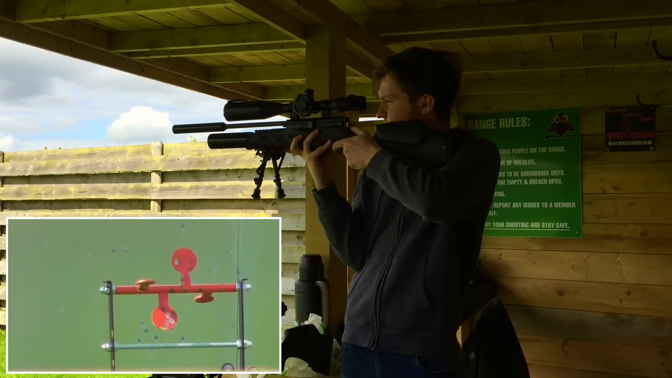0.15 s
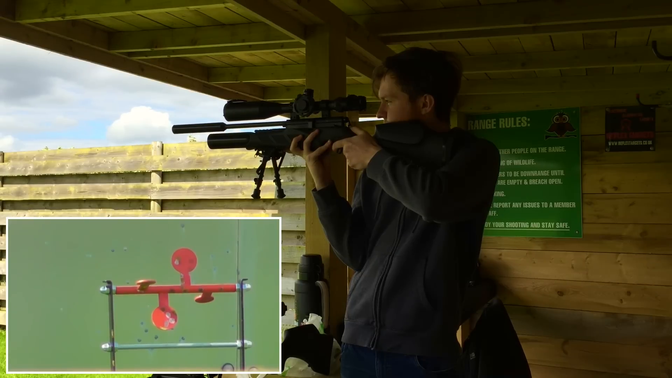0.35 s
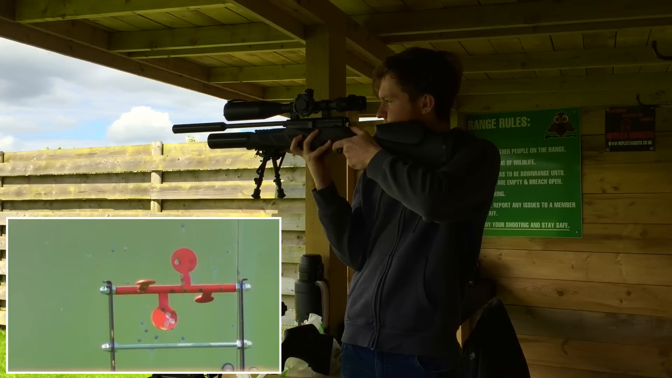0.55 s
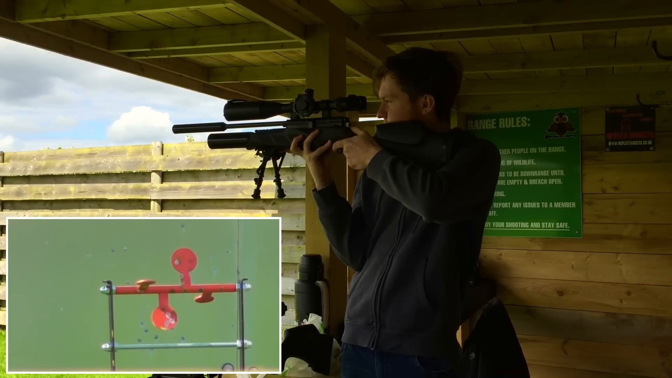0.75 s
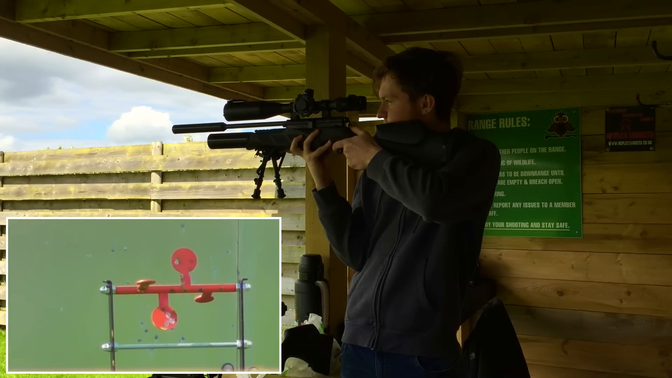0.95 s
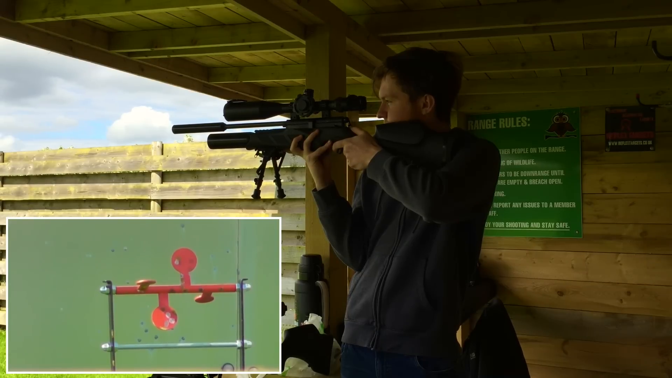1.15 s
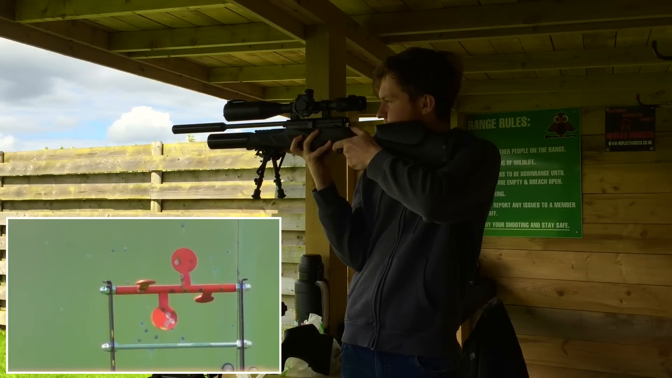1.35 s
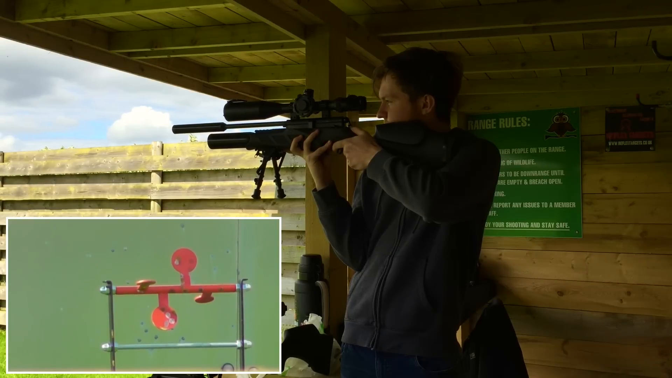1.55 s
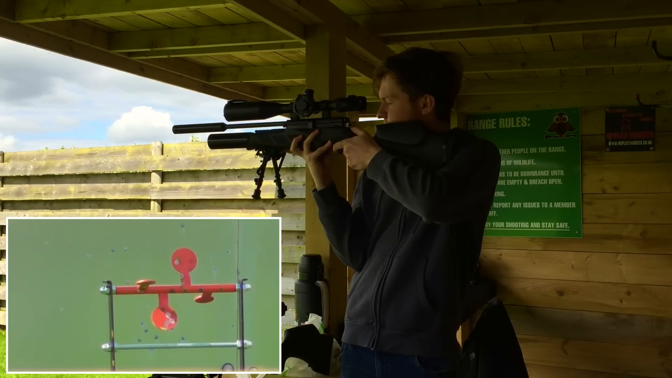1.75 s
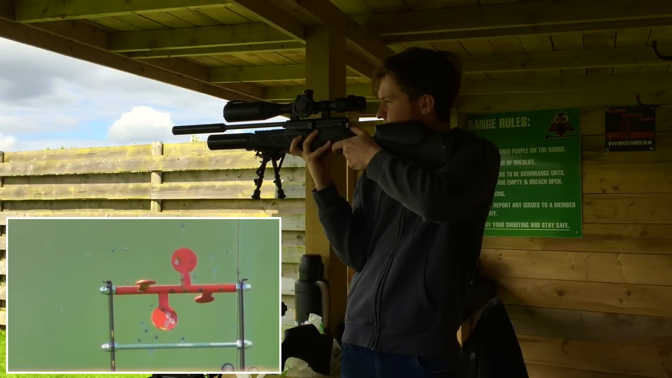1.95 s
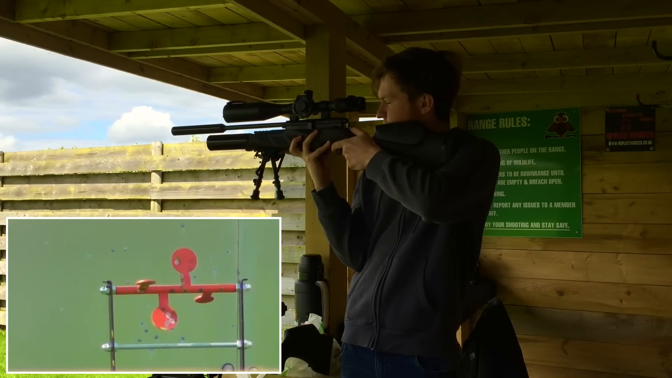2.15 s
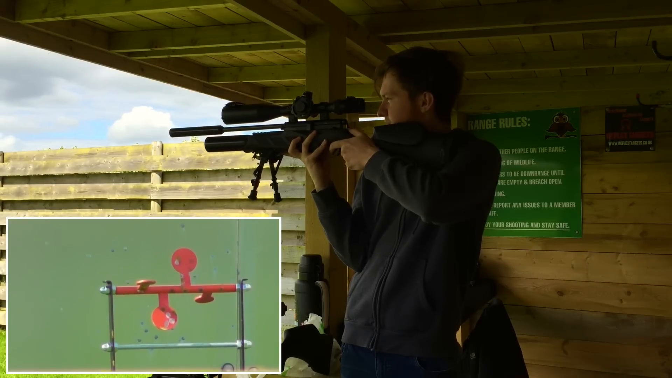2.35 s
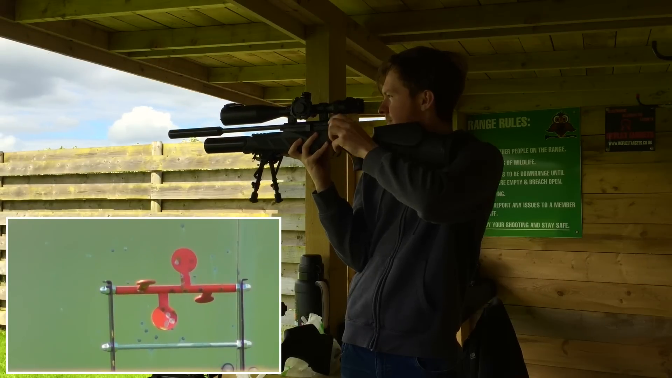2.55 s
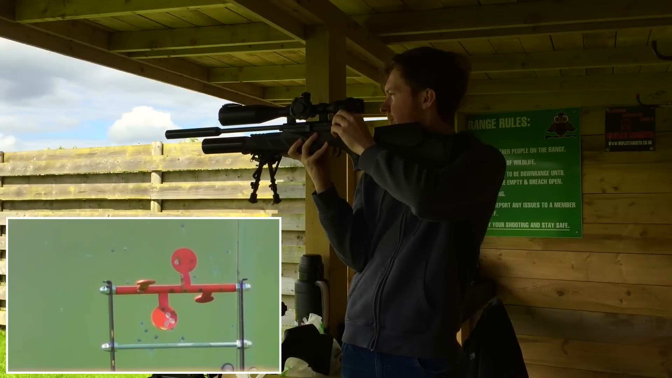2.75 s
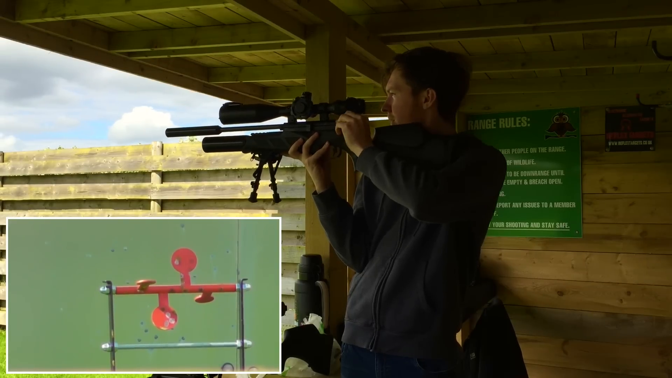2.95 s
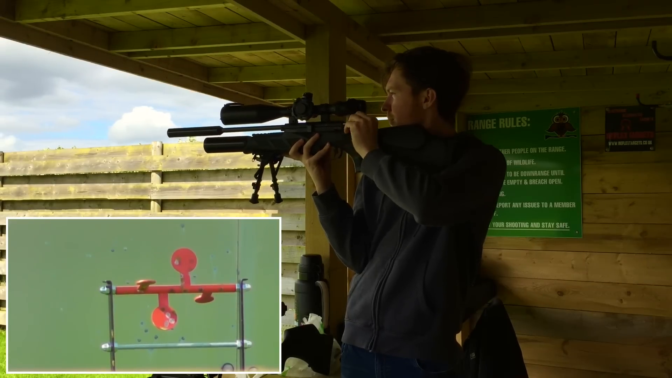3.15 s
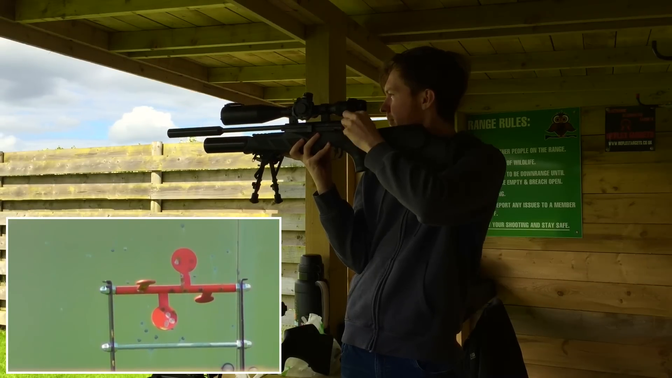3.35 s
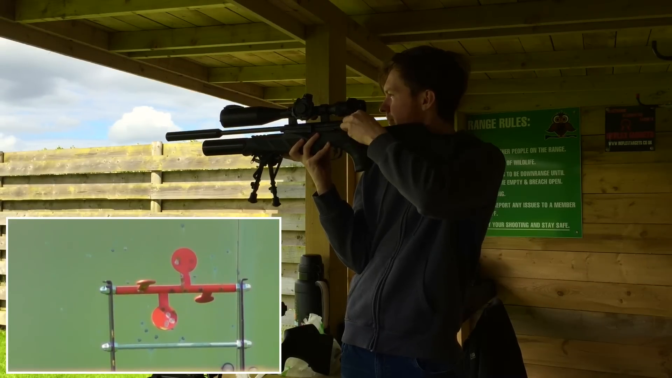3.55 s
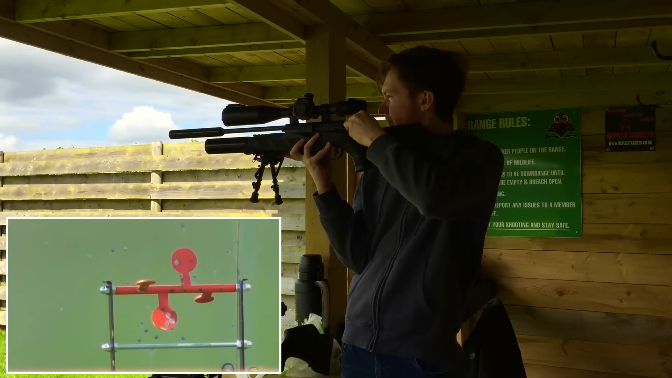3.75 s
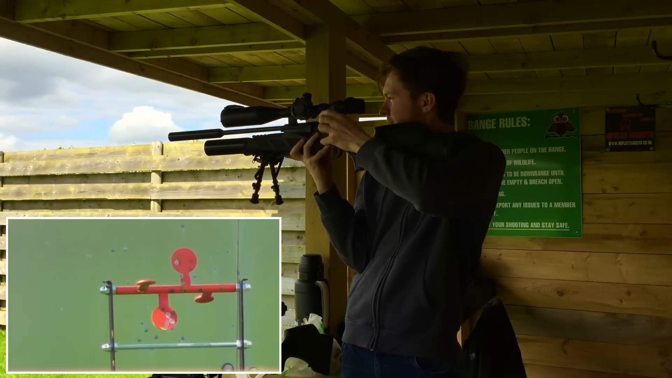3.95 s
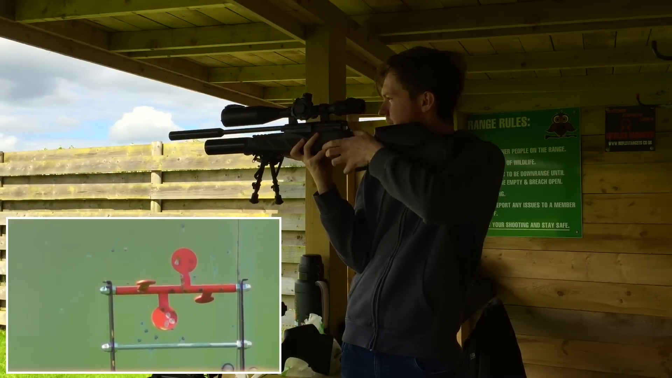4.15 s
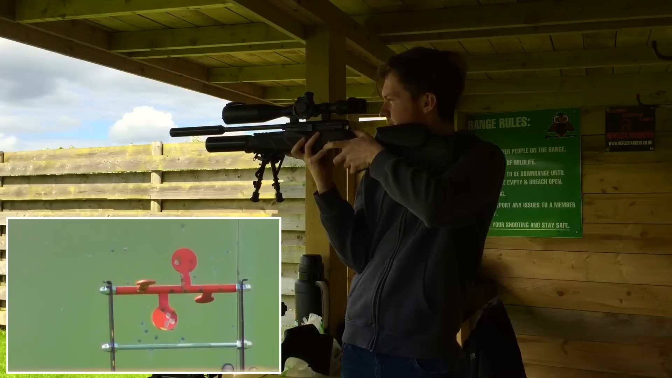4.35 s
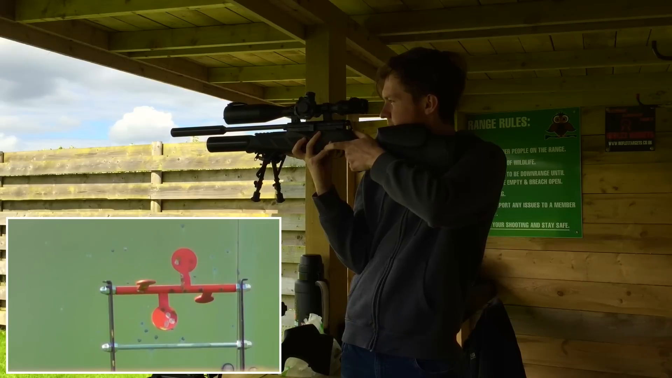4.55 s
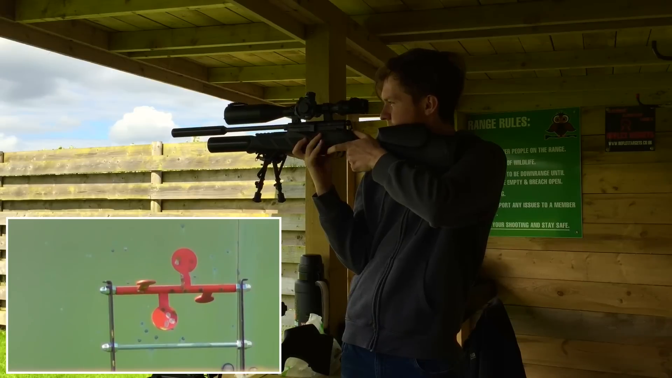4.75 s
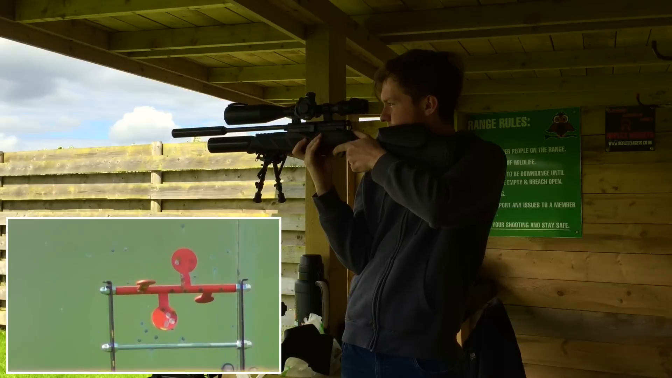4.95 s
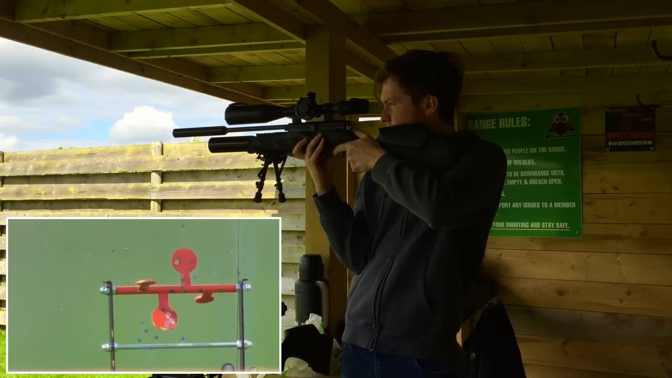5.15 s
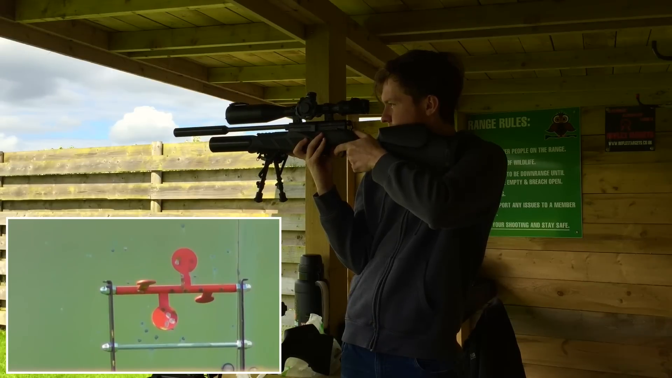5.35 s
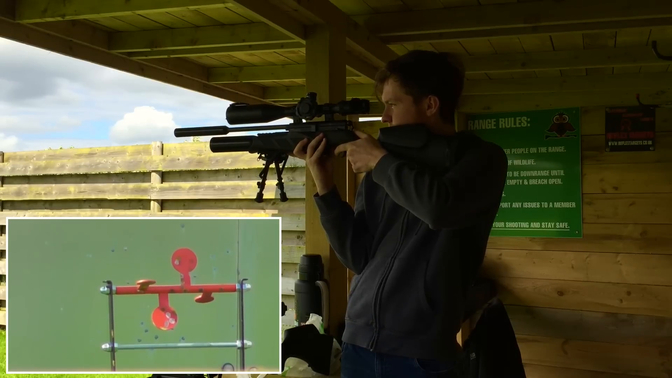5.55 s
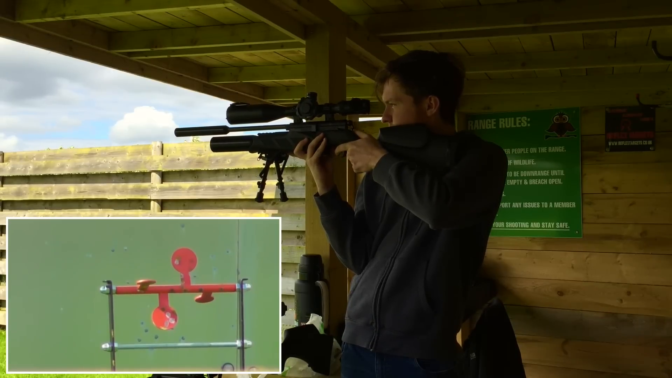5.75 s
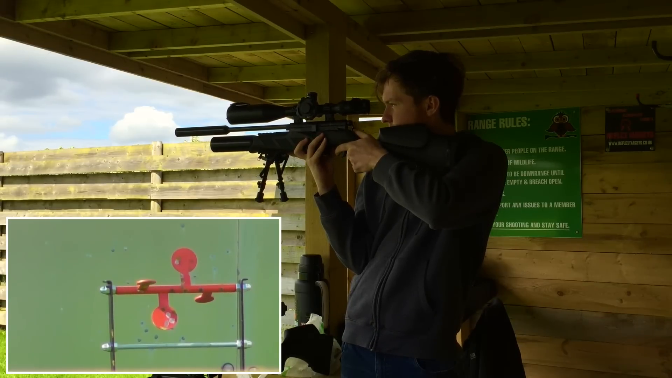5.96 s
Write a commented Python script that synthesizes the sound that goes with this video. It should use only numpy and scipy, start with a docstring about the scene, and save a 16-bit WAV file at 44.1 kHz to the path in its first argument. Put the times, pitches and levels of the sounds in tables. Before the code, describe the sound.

An air rifle fires once, the pellet clangs off a steel target, then the bolt clicks through a reload over light wind.

```python
"""On an outdoor range, an air rifle is fired from a wooden shelter: a hammer knocks a valve open and
air bursts out. The pellet splatters on a steel spinner target, which rings and echoes off a fence.
The shooter unlatches the bolt, draws it back, pushes it forward and locks it, with clicks and knocks.
A light wind rumbles on the microphone over a distant hum.
A "fade time" is how long a sound takes to drop 60 dB; a "tilt" above zero makes it brighter."""
import sys
import numpy as np
from scipy import signal
from scipy.fft import rfft, irfft, next_fast_len
from scipy.io import wavfile
from scipy.ndimage import uniform_filter1d

SR = 44100
rng = np.random.default_rng(int(sys.argv[2]) if len(sys.argv) > 2 else 0)


def to_wav(s):
    """Save 16-bit WAV."""
    ch = np.atleast_2d(s).T  # columns
    pcm = np.round(np.clip(ch, -1, 1) * 32767)  # PCM
    wavfile.write(sys.argv[1], SR, pcm.astype(np.int16))


N = 265305
TIME = np.arange(N) / SR   # seconds since the scene began
AGE = TIME[:int(1.2 * SR)]   # seconds since a single sound began

# air leaving the muzzle: (time [s], level [dB], fade time [s], tilt [dB/octave])
AIR_BLASTS = [(1.7733, -13, 0.06, 0), (1.7830, -25, .03, 0.0045)]
# the pellet and its fragments hitting steel: (time [s], level [dB], fade time [s], tilt [dB/octave])
PELLET_HITS = [(2.0544, -20, .005, 0), (2.0620, -26, .006, 1), (2.1036, -27, .006, 0),
               (2.1350, -32, .008, -3)]
SHOT_S, HIT_S = AIR_BLASTS[0][0], PELLET_HITS[0][0]


def shot():
    """The hammer knocks the valve open and air bursts from the muzzle."""
    # hammer blows: (time [s], level [dB], fade time [s], tilt [dB/octave])
    hammer_blows = [(1.764, -40, 0.092, -2.5), (1.7705, -13, 0.0016, -3), (1.7715, -15.5, 0.0031, -0.5)]
    # tone of the shot: (frequency [Hz], relative level [dB])
    shot_colour = [(35, -30), (70, -4), (270, -2), (480, -11), (900, -5.5), (1130, -6), (1500, -3),
                   (2100, -3.5), (3000, -5), (4000, -3), (4900, -6), (7000, -4), (10500, -10), (16000, -14)]
    out = np.zeros(N)
    for s, db, fade_s, tilt in hammer_blows + AIR_BLASTS:
        add(out, s, from_db(db) * burst(shot_colour, fade_s, tilt))
    return out


def rifle_ring_and_boom(boom_db=-17, boom_rise_s=.022, boom_fade_s=0.13):
    """The rifle's tubes ring on, and a low boom builds up under the roof."""
    # notes of the barrel and air cylinder: (pitch [Hz], level [dB], fade time [s])
    rifle_notes = [(1074, -27, 0.13), (614.3, -32, 0.22), (3494, -34, 0.15), (4041, -27, 0.14),
                   (5644, -28.5, 0.21), (7500, -32, 0.081), (9120, -30, 0.11)]
    # tone of the boom: (frequency [Hz], relative level [dB])
    boom_colour = [(40, -13), (85, 2), (160, -5.5), (265, 5), (490, -9), (660, 2), (1100, -4), (2200, -15),
                   (8000, -46)]
    out = np.zeros(N)
    loudness = (1 - np.exp(-(AGE / boom_rise_s) ** 2)) * fade(boom_fade_s)
    boom = colour(rng.standard_normal(len(AGE)) * loudness, boom_colour)
    add(out, SHOT_S, from_db(boom_db) * boom + ring(rifle_notes))
    return out


def pellet_splat(splat_db=-24):
    """The pellet and its fragments crack on the steel, and the soft lead flattens."""
    # tone of each crack: (frequency [Hz], relative level [dB])
    crack_colour = [(200, -44), (900, 2), (7000, 7), (16000, -11)]
    # tone of the lead flattening: (frequency [Hz], relative level [dB])
    splat_colour = [(1000, -20.5), (5000, -3), (6800, 13), (8200, -1), (10000, -41)]
    out = np.zeros(N)
    for s, db, fade_s, tilt in PELLET_HITS:
        add(out, s, from_db(db) * burst(crack_colour, fade_s, tilt))
    add(out, HIT_S, from_db(splat_db) * burst(splat_colour, fade_s=0.049))
    return out


def spinner_clang(crowd_db=-31, wash_db=-28, notes_db=-3):
    """The struck spinner and its frame ring with a few strong notes and a crowd of weak ones."""
    # strong notes: (pitch [Hz], relative level [dB], fade time [s])
    spinner_notes = [(1098, -47.5, 1), (1450, -55, .7), (1600, -39, 0.48), (1620, -53, 0.58),
                     (2014, -25.5, 0.19), (2060, -48, 0.43), (2114, -29, 0.21), (2354, -37.5, 1),
                     (2547, -34, 0.88), (2557, -44, 0.42), (2910, -29.5, 0.2), (3500, -44, .65),
                     (3430, -48.5, 0.55), (3990, -44, 0.66), (4180, -32.5, 0.55), (4370, -31.5, 0.32),
                     (4340, -74, .5), (5470, -44, .6), (6000, -39, 0.38), (6770, -49.5, 0.794)]
    # tone of the weak notes: (frequency [Hz], relative level [dB])
    clang_colour = [(200, -17.5), (550, -22), (850, -12), (1300, -3), (2200, 7.5), (3100, -0.5), (4000, 7),
                    (5000, 0), (7000, 2.5), (9500, 0), (12000, -2), (16000, -6.5)]
    # how long the weak notes ring: (frequency [Hz], fade time [s])
    clang_fades = [(300, 1), (1200, 1), (2300, 0.9), (4000, 0.69), (7000, 0.56), (10000, 0.4),
                   (14000, 0.29)]
    out = np.zeros(N)
    crowd = from_db(crowd_db) * dying_noise(clang_fades, notes_per_hz=0.092)
    wash = from_db(wash_db) * dying_noise(clang_fades) * fade(3.3)   # the most crowded notes die first
    clang = colour(crowd + wash, clang_colour) + from_db(notes_db) * ring(spinner_notes)
    spreading = 1 - 0.19 * fade(0.064)   # the shaking takes a moment to fill the frame
    add(out, HIT_S, clang * spreading)
    return out


def lead_spray(db=-33, start_hz=17400, end_hz=11200, drop_hz_per_s=105000):
    """Bits of lead spray off: a hiss that swells after the hit while its pitch drops."""
    pitch = np.clip(start_hz - drop_hz_per_s * (TIME - HIT_S), end_hz, start_hz)
    loudness = from_db(db) * swell(2.112, rise_s=.023, fall_s=.010) * (TIME > HIT_S)
    return loudness * narrow_noise(pitch, width_hz=1900)


def bolt_action(steel_ring_db=-8, stock_ring_db=-7, bounce_s=.002, bounce_db=-2.5):
    """The bolt slides; each contact clicks on steel, knocks on the stock (the rifle's body) and bounces."""
    # parts meeting: (time [s], steel level [dB], stock level [dB], steel tilt [dB/octave])
    contacts = [(2.462, -58, -56.5, -13), (3.2594, -38.5, -36.5, 0), (3.7100, -37.5, -44, 0),
                (3.7235, -17.5, -27.5, 1), (3.88, -44.5, -47.5, -11.5), (3.966, -47, -71, 2.5),
                (4.0019, -40.5, -59, 1.5), (4.0210, -46, -44, 4), (4.0435, -22, -29, 3.5),
                (4.178, -39, -27, 8)]
    # tones of a click and of a knock: (frequency [Hz], relative level [dB])
    steel_colour = [(300, -32), (1200, -16.5), (2400, -1.5), (3100, -0.5), (4600, -1), (5600, 8),
                    (6600, -1.5), (8200, -1.5), (10500, -7), (12700, -6.5), (16000, -17.5)]
    stock_colour = [(120, -35), (300, -15), (450, -19), (650, -2), (950, -4.5), (1450, 4.5), (1850, -1.5),
                    (2500, -6.5), (4000, -7.5), (9000, -24.5), (16000, -33)]
    # notes of the steel and of the stock: (pitch [Hz], relative level [dB], fade time [s])
    steel_notes = [(2330, -28, .1), (3710, -33, .1), (5560, -28, .22), (6400, -35, .1)]
    stock_notes = [(1310, -25, 0.1), (1470, -22.5, 0.057)]
    # slides of the bolt: (peak time [s], level [dB])
    slides = [(3.705, -58.5), (4.018, -55)]
    out = np.zeros(N)
    steel_ring, stock_ring = ring(steel_notes), ring(stock_notes)
    for s, steel_db, stock_db, tilt in contacts:
        fade_s = .011 * np.exp(-0.0166 * steel_db)   # a hard contact snaps shut, a light one chatters on
        bounce_delay = bounce_s * rng.uniform(.5, 2)
        for delay, db in ((0, 0), (bounce_delay, bounce_db)):
            add(out, s + delay, from_db(steel_db + db) * burst(steel_colour, fade_s, tilt))
            add(out, s + delay, from_db(stock_db + db) * burst(stock_colour, fade_s))
        add(out, s, from_db(steel_db + steel_ring_db) * steel_ring)
        add(out, s, from_db(stock_db + stock_ring_db) * stock_ring)
    return out + sliding(slides, stock_colour, rise_s=0.021, fall_s=0.014)


def handling(note_db=-3.0, tick_db=-2.0):
    """Small tinks, each a tick with a short note, and a soft rub of the hand along the stock."""
    # tinks: (time [s], pitch [Hz], relative level [dB], note's fade time [s])
    tinks = [(2.6970, 4140, -40.5, .04), (2.6965, 9300, -65, .035), (2.8910, 3950, -55, .04),
             (3.2240, 6200, -61, .03)]
    # stroke of the hand: (peak time [s], level [dB])
    rubs = [(3.072, -50.5)]
    # tone of the hand on the stock: (frequency [Hz], relative level [dB])
    rub_colour = [(90, -8), (220, 13), (390, -7), (500, -2), (565, 7), (660, 0), (850, -6), (1400, -31),
                  (8000, -57)]
    out = np.zeros(N)
    for s, hz, db, fade_s in tinks:
        tick_colour = [(.6 * hz, -45), (.92 * hz, -18), (hz, 0), (1.08 * hz, -18), (1.5 * hz, -45)]
        add(out, s, from_db(db + tick_db) * burst(tick_colour, fade_s=0.031))
        add(out, s, ring([(hz, db + note_db, fade_s)]) * (1 - fade(0.0045)))
    return out + sliding(rubs, rub_colour, rise_s=.011, fall_s=0.049)


def sliding(strokes, spectrum, rise_s, fall_s):
    """Two surfaces rub, making noise that swells with each short stroke."""
    pressure = sum(from_db(db) * swell(s, rise_s, fall_s) for s, db in strokes)
    return pressure * colour(rng.standard_normal(N), spectrum)


def with_echoes(sound, shelter_db, field_db, first_echo_s=0.002664):
    """Roof and walls answer almost at once; fences and trees scatter a faint, long tail."""
    # how long the near and far echoes last: (frequency [Hz], fade time [s])
    shelter_fades = [(100, 0.34), (500, 0.245), (2000, 0.2261), (6000, 0.1435), (14000, 0.19)]
    field_fades = [(100, .7), (1000, 1.2), (4000, 0.97), (8000, 1.6), (14000, 0.93)]
    # tone of the far echoes: (frequency [Hz], relative level [dB])
    field_colour = [(100, -5.5), (500, 0.5), (1200, 2), (2400, 1.5), (4000, 1), (7000, -7), (14000, -9)]
    near = even(dying_noise(shelter_fades), evenness=0.33) * np.clip(AGE / first_echo_s - .5, 0, 1)
    far = colour(dying_noise(field_fades) * (1 - fade(0.069)), field_colour)
    echoes = from_db(shelter_db) * near / np.linalg.norm(near)
    echoes += from_db(field_db) * far / np.linalg.norm(far)
    return sound + signal.fftconvolve(sound, echoes)[:N]


def fence_echo(sound, delay_s=.04, echo_db=-14):
    """Boards throw back a dull, smeared copy."""
    # tone of the echo: (frequency [Hz], relative level [dB])
    board_colour = [(300, -9), (1200, 4), (2500, -8), (5000, -32.0), (12000, -13.0)]
    out = np.zeros(N)
    smear = burst(board_colour, fade_s=0.1)
    add(out, delay_s, signal.fftconvolve(sound, smear / np.linalg.norm(smear))[:N])
    return from_db(echo_db) * out


def wind(wander_db=3.5, sag_s=0.023, swirl_db=-17.5):
    """Wind rumbles unevenly on the microphone; short puffs sag in pitch and stir up small swirls."""
    # strength of the rumble: (time [s], level [dB])
    strength = [(0, -52), (0.33, -62), (0.5, -50), (0.78, -60), (0.95, -52.5), (1.3, -52.5), (1.5, -58),
                (1.85, -50.5), (2.2, -56), (3.0, -52), (3.9, -56), (4.22, -53), (4.34, -63.5),
                (4.58, -49.5), (4.92, -59), (5.3, -53), (6.02, -57.5)]
    # puffs: (peak time [s], level [dB], pitch at the peak [Hz])
    puffs = [(0.037, -40, 104), (0.206, -39, 91), (0.246, -41.5, 70.5), (0.649, -40.5, 72),
             (1.122, -38, 91.5), (2.406, -38.5, 85), (2.967, -40.5, 86.2), (3.147, -39.5, 100),
             (3.577, -42, 100), (3.640, -27.5, 95), (4.571, -42, 112), (4.625, -43.5, 61.9),
             (4.884, -38, 77), (5.256, -36.5, 90), (5.683, -42.5, 68)]
    # tones of the rumble and of the swirls: (frequency [Hz], relative level [dB])
    rumble_colour = [(15, -42), (30, -12), (55, 2.5), (100, -2), (125, -8.5), (170, -15.5), (260, -29.5),
                     (400, -39.5), (1500, -79.5)]
    swirl_colour = [(60, -11), (150, 2.5), (280, -4), (450, -24), (1200, -60)]
    rumble = colour(rng.standard_normal(N), rumble_colour)
    swirls = from_db(swirl_db) * colour(rng.standard_normal(N), swirl_colour)
    rumble /= np.sqrt(uniform_filter1d(rumble ** 2, size=2500))   # steady the level before shaping it
    rumble_db = np.interp(TIME, *np.transpose(strength)) + wander_db * wander(step_s=.05)
    out = from_db(rumble_db) * rumble
    for s, db, hz in puffs:
        cycles = hz * sag_s * (1 - np.exp(np.minimum((s - TIME) / sag_s, 2)))
        push = from_db(db) * swell(s, rise_s=0.0074, fall_s=0.014)
        out += push * (np.sin(2 * np.pi * cycles) + swirls)
    return out


def distant_hum_and_air(air_db=-66.63, swell_db=1.78):
    """A wavering hum, and far-off noise that swells gently."""
    # notes of the hum: (pitch [Hz], level [dB])
    hum_notes = [(189.5, -67.5), (212, -74), (236, -74.5), (283, -80)]
    # tone of the far-off noise: (frequency [Hz], relative level [dB])
    air_colour = [(150, -29.5), (250, -4), (308, -8.5), (436, -12.5), (597, -10.5), (735, -5), (955, -5.5),
                  (1120, -10.5), (1980, -19), (3460, -25), (4900, -29), (9330, -34), (10400, -36.5),
                  (14400, -36.5), (16000, -50.5)]
    hum = sum(from_db(db) * narrow_noise(hz, width_hz=14) for hz, db in hum_notes)
    gain = from_db(swell_db * wander(step_s=0.17))
    air = from_db(air_db) * colour(rng.standard_normal(N), air_colour)
    low_air = signal.sosfilt(signal.butter(2, 1500, fs=SR, output="sos"), air)
    return hum + air + (gain - 1) * low_air   # the high hiss stays steady


def burst(spectrum, fade_s, tilt=0):
    """A short, fading rush of random pressure pulses."""
    count = SR // 10
    pulses = rng.choice([-1, 1], count) * fade(fade_s)[:count]
    return colour(even(pulses), spectrum, tilt)


def ring(notes):
    """A struck object's fading notes, each starting at a random point in its wave."""
    return sum(from_db(db) * fade(fade_s) * np.sin(2 * np.pi * (hz * AGE + rng.random()))
               for hz, db, fade_s in notes)


def dying_noise(fades, notes_per_hz=None):
    """Hiss, or a crowd of random notes, in which each quarter octave fades at its own rate."""
    hz = np.maximum(np.fft.rfftfreq(len(AGE), 1 / SR), 100)
    spectrum = rfft(rng.standard_normal(len(AGE)))
    if notes_per_hz:
        chosen = rng.random(len(hz)) < notes_per_hz / AGE[-1]
        spectrum *= unit_level(chosen.astype(float))
    band = 2 ** (np.round(4 * np.log2(hz)) / 4)
    return sum(irfft(spectrum * (band == centre), len(AGE)) * fade(at_hz(fades, centre))
               for centre in np.unique(band))


def narrow_noise(hz, width_hz):
    """Noise gathered round a steady or moving pitch."""
    smoothing = signal.butter(2, width_hz / 2, fs=SR, output="sos")
    slow = signal.sosfilt(smoothing, rng.standard_normal((2, N)))
    phase = 2 * np.pi * np.cumsum(hz * np.ones(N)) / SR
    return unit_level(slow[0] * np.cos(phase) + slow[1] * np.sin(phase))


def colour(sound, spectrum, tilt=0):
    """Make some frequencies stronger and others weaker; plain hiss keeps its overall level."""
    size = 2 * next_fast_len(len(sound) // 2 + 512, True)
    hz = np.maximum(np.fft.rfftfreq(size, 1 / SR), 1)
    gain = unit_level(from_db(at_hz(spectrum, hz) + tilt * np.log2(1 + hz / 1000)))
    # fold the filter forward in time, so nothing is heard before the sound starts
    cepstrum = irfft(np.log(gain + 1e-9))
    cepstrum[1:size // 2] *= 2
    cepstrum[size // 2 + 1:] = 0
    return irfft(rfft(sound, size) * np.exp(rfft(cepstrum)))[:len(sound)]


def even(sound, evenness=.8):
    """Spread a short sound's energy more evenly from low to high, as a hard contact does."""
    spectrum = rfft(sound, 2 * len(sound))
    evened = irfft(spectrum / (np.abs(spectrum) + 1e-9) ** evenness)[:len(sound)]
    return evened * np.linalg.norm(sound) / np.linalg.norm(evened)


def swell(s, rise_s, fall_s):
    """A rounded rise to 1 at time s, and a rounded fall."""
    away = (TIME - s) / np.where(TIME < s, rise_s, fall_s)
    return np.exp(-np.minimum(away ** 2, 20))


def wander(step_s):
    """A new random value every step, joined by straight lines."""
    return np.interp(TIME / step_s, np.arange(N), rng.standard_normal(N))


def fade(fade_s):
    """Start at 1 and drop 60 dB every fade_s seconds."""
    return from_db(-60 * AGE / fade_s)


def add(track, s, sound):
    """Lay a sound into a track at time s."""
    start = round(s * SR)
    track[start:start + len(sound)] += sound[:N - start]


def at_hz(points, hz):
    """Read between a table's rows, giving every octave equal room."""
    known, values = np.transpose(points)
    return np.interp(np.log(np.maximum(hz, 1)), np.log(known), values)


def from_db(db):
    """Turn decibels into a number to multiply by."""
    return np.exp(np.asarray(db) * (np.log(10) / 20))


def unit_level(x):
    """Scale to an average (rms) level of 1."""
    return x / np.sqrt(np.mean(x ** 2) + 1e-20)


def scene():
    """The rifle under the roof, the target down the range and the open air, in one channel."""
    rifle = with_echoes(shot(), shelter_db=0.5, field_db=-23.0) + rifle_ring_and_boom()
    reloading = with_echoes(bolt_action() + handling(), shelter_db=-4.0, field_db=-28.0)
    target = pellet_splat() + spinner_clang() + lead_spray()
    return (rifle + reloading + target + fence_echo(target) + wind() + distant_hum_and_air())[None]


def record(dry):
    """The very highest treble is cut off steeply."""
    cutoff_hz = 16200
    return signal.sosfilt(signal.ellip(10, .1, 80, cutoff_hz, fs=SR, output="sos"), dry)


dry = scene()
out = record(dry)
to_wav(out)
```